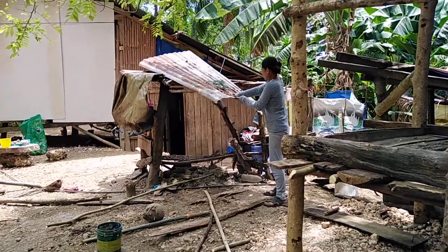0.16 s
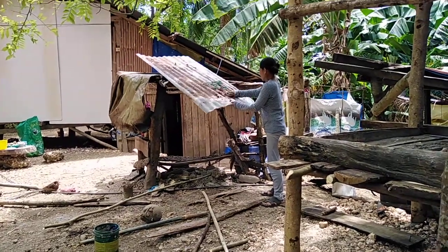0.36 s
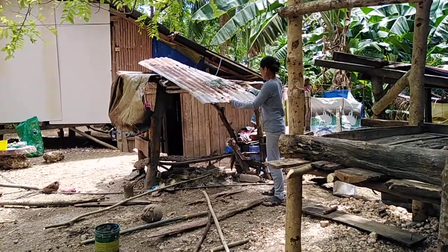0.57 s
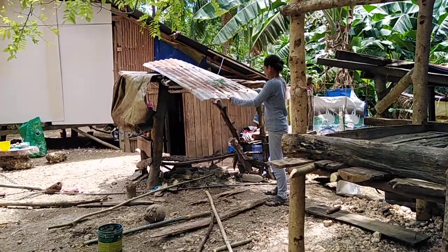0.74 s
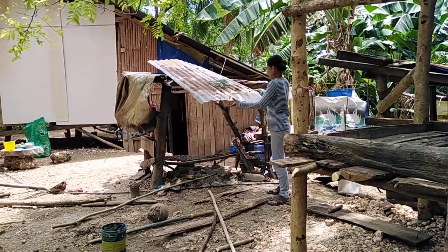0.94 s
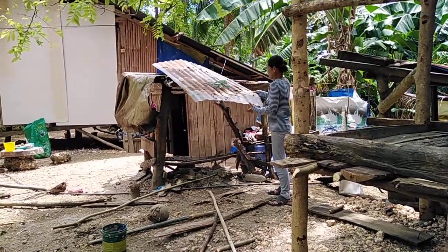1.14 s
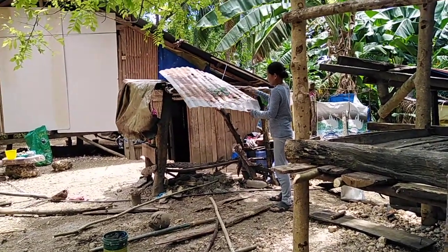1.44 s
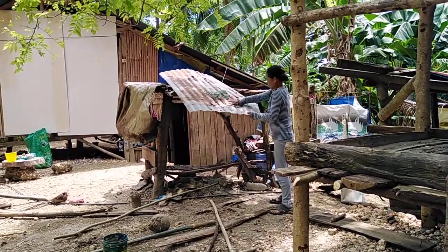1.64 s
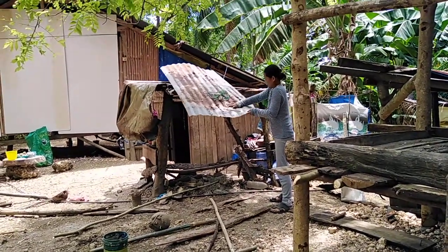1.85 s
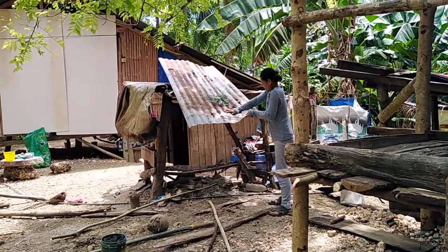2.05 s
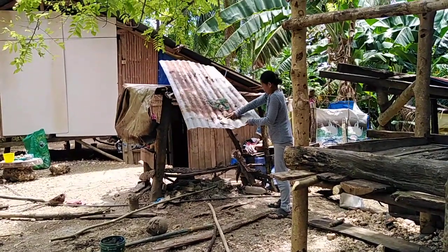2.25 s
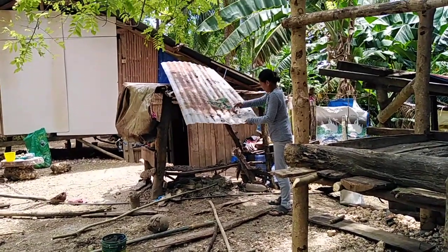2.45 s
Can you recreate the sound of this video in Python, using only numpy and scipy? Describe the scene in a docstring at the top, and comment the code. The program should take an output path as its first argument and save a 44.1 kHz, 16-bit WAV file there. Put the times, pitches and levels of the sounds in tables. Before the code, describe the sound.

Close outdoor stereo pickup of thin rusty sheet metal jolting and grating in bright clanging bursts, a short lull with wooden snaps and a soft knock, then renewed crashes and squeaks over faint leaves and a far engine.

```python
"""Outdoors at a hut: a rusty corrugated sheet is dragged off the roof frame, close to a small stereo pair.
It scrapes and jolts over the rafters: showers of tiny slips and single blows ring a plate of dense modes.
Dry stick snaps, a soft knock and short squeaks are sums of sines; a slow engine far away is a few
harmonics of its firing rate. Leaves, distance and low wind are filtered noise. The input clips at full scale."""
import sys
import numpy as np
from scipy import signal
from scipy.fft import rfft, irfft
from scipy.io import wavfile
from scipy.ndimage import uniform_filter1d

SR = 44100
rng = np.random.default_rng(int(sys.argv[2]) if len(sys.argv) > 2 else 0)


def master_out(mix):
    """Clip the mix to full scale and print it as 16-bit PCM to the path in sys.argv[1]."""
    frames = np.transpose(np.atleast_2d(mix))
    ceiling = np.clip(frames, -1, 1)
    pcm = np.round(ceiling * 32767).astype(np.int16)
    wavfile.write(sys.argv[1], SR, pcm)


def undo_db(level):
    """Turn decibels back into plain size, where 20 dB means ten times bigger."""
    steps = np.asarray(level, float) / 20
    return 10 ** steps


N = 116865  # samples in the scene
LEFT_LAG_S = 0.00006  # the left port hears the sound this much later
LEAD = 256  # samples ahead of a strike, room for the band filters to swing in


def evened(x):
    """Scales a sound to unit rms."""
    return x / np.sqrt(np.mean(x ** 2) + 1e-20)


def read(points, hz):
    """Reads a curve of (frequency [Hz], value) points along a logarithmic frequency axis."""
    f, value = np.transpose(points)
    return np.interp(np.log(hz + 1), np.log(f + 1), value)


def add(mix, s, sound):
    """Adds a sound into the mix at s seconds, cut off at the end of the mix."""
    part = mix[..., round(s * SR):][..., :sound.shape[-1]]
    part += sound[..., :part.shape[-1]]


def modes(table, length, detune):
    """Sum of exponentially dying sines (Hz, dB, t60 s), each randomly detuned by a small fraction."""
    t = np.arange(0, length, 1 / SR)
    total = np.zeros(len(t))
    for hz, db, t60 in table:
        tuned_hz = hz * (1 + detune * rng.standard_normal())
        total += undo_db(db - 60 * t / t60) * np.sin(2 * np.pi * tuned_hz * t)
    return total


def ports(a, b):
    """Two microphone ports: a shared and an unrelated part, a small delay and a colour lean."""
    # how alike the ports are: (frequency [Hz], left-right likeness [0 to 1])
    likeness = [(60, 0.69), (370, 1), (700, 0.88), (1250, 0.88), (2300, 0.47), (4200, 0.15), (7700, 0.1),
                (14000, 0.13)]
    # colour difference of the ports: (frequency [Hz], left over right [dB])
    port_lean = [(60, -16), (91, -5), (140, 3.5), (210, -2), (320, 1), (490, -3), (750, 1.5), (1140, 1),
                 (1730, 2.5), (2630, 3), (4010, 8), (6110, -0.5), (9290, -10), (14200, 9)]
    hz = np.fft.rfftfreq(a.shape[-1], 1 / SR)
    same = np.clip(read(likeness, hz), -1, 1)
    lean = undo_db(read(port_lean, hz) / 2)  # half the difference on each port
    shared = rfft(a)
    left = shared * lean * np.exp(-2j * np.pi * hz * LEFT_LAG_S)
    right = (same * shared + np.sqrt(1 - same ** 2) * rfft(b)) / lean
    return irfft(np.array([left, right]), a.shape[-1])


def air():
    """Wash of leaves and distance as coloured noise, with low wind as a narrow band of bass noise."""
    # colour of the outdoor wash: (frequency [Hz], relative density [dB per Hz])
    wash_colour = [(76, -32), (130, 5.5), (209, -12), (286, 0), (529, -5.5), (619, -34), (901, -4),
                   (1450, -2), (2420, -15), (5230, -6), (6760, -14), (7460, -10), (14600, -22)]
    wash_db, wind_db = -48, -65  # rms over both ports
    hz = np.fft.rfftfreq(N + 1, 1 / SR)
    white = rng.standard_normal((2, N + 1))
    wash = irfft(rfft(white) * undo_db(read(wash_colour, hz)), N + 1)
    wind_band = signal.butter(3, [38, 60], "band", fs=SR, output="sos")
    wind = signal.sosfilt(wind_band, rng.standard_normal((2, N + 1)))
    both = undo_db(wash_db) * evened(ports(*wash)) + undo_db(wind_db) * evened(ports(*wind))
    return both[:, :N]


def engine():
    """Far slow single-cylinder engine: low orders of the firing rate, each firing sweeping down."""
    # pace of the engine: (time [s], firings per second [Hz])
    firing_rate = [(0, 18.6), (.4, 18.6), (.7, 17.95), (1.15, 17.95), (1.3, 17.45), (2.0, 17.5),
                   (2.3, 17.95), (2.65, 18.1)]
    # harmonics of the firing rate: (multiple, relative level [dB])
    orders = [(2, -24), (3, -21), (4, -2.5), (5, -5), (6, -7.5), (7, -13), (8, -17)]
    # loudness of the engine at the microphone: (time [s], level [dB])
    distance_level = [(0, -54.5), (.7, -56.5), (1.3, -56), (1.8, -54), (2.65, -50.5)]
    start_turns, sweep_rad = 0.536, 0.1
    t = np.arange(N) / SR
    turns = start_turns + np.cumsum(np.interp(t, *np.transpose(firing_rate))) / SR
    thump = np.zeros(N)
    for k, db in orders:
        lag = sweep_rad * (k - 5) ** 2  # the lower orders arrive later in each firing
        thump += undo_db(db) * np.cos(2 * np.pi * k * turns + lag)
    return undo_db(np.interp(t, *np.transpose(distance_level))) * evened(thump)


def thuds():
    """Soft low knock: one dying sine with a gentle rise."""
    # knocks, each begun 4 ms ahead of its time: (time [s], level before the rise [dB], pitch [Hz], t60 [s])
    low_knocks = [(1.242, -20.5, 276, 0.02)]
    out = np.zeros(N)
    for s, db, hz, t60 in low_knocks:
        ring = modes([(hz, db, t60)], 0.1, 0)
        rise = np.minimum(np.arange(len(ring)) / SR / 0.0038, 1)
        add(out, s - 0.004, ring * rise)
    return out


def snaps():
    """Dry stick snaps: a cluster of very short modes, pitched and damped anew for each snap."""
    # snaps: (time [s], peak before the low cut [dB], pitch factor, ring time factor)
    breaks = [(.8965, -19, 1.35, .35), (1.2068, -5, 1.0, .9), (1.4622, -14, .65, .8)]
    # modes of the stick before those factors: (frequency [Hz], relative level [dB], t60 [s])
    stick_modes = [(764, -14, 0.046), (910, -12, 0.051), (1280, -4.5, 0.027), (1600, -20, 0.027),
                   (1880, 3, 0.015), (2005, -4, 0.073), (2330, 9, 0.015), (2700, 11, 0.017),
                   (3050, -3, 0.042), (3430, 14.5, 0.0095), (4040, -15, 0.015), (4530, 4.5, 0.011),
                   (5260, -16, .01), (7800, -18, .012)]
    low_cut_hz, rise_s = 636, 0.00027
    out = np.zeros(N)
    for s, db, pitch, ring_time in breaks:
        table = [(hz * pitch, g, t60 * ring_time) for hz, g, t60 in stick_modes]
        ring = modes(table, 0.15, 0.0072)
        ring *= np.minimum(np.arange(len(ring)) / SR / rise_s, 1)
        add(out, s, undo_db(db) * ring / abs(ring).max())
    return signal.sosfilt(signal.butter(4, low_cut_hz, "high", fs=SR, output="sos"), out)


def squeaks():
    """A part of the sheet sings briefly on one wavering note, then dies."""
    # squeaks: (time [s], level [dB], mean pitch [Hz], time from onset to the start of the decay [s])
    notes = [(.036, -26.5, 2650, 0.0086), (.378, -17, 5030, .006), (.536, -18, 2650, 0.012),
             (.991, -31.5, 1870, 0.0093), (1.557, -27, 7800, 0.0068), (1.732, -28, 1173, 0.0099),
             (1.776, -6.5, 5080, 0.002), (1.85, -13.5, 1135, 0.0056), (2.165, -24, 1200, 0.019)]
    rise_s, t60_s, wobble_rms = 0.0029, 0.026, 0.014  # wobble as a fraction of the pitch
    out, u = np.zeros(N), np.arange(SR // 10) / SR
    for s, db, hz, held in notes:
        waver = evened(uniform_filter1d(rng.standard_normal(len(u)), 60))
        phase = 2 * np.pi * np.cumsum(hz * (1 + wobble_rms * waver)) / SR
        shape = np.minimum(u / rise_s, 1) * undo_db(-60 * np.maximum(u - held, 0) / t60_s)
        add(out, s, undo_db(db) * shape * np.sin(phase))
    return out


def knocks():
    """Snaps, squeaks and the low knock at the pair, with a little dying noise as scatter from the hut."""
    scatter_db, scatter_t60_s = -11.5, 0.095
    direct = snaps() + squeaks() + thuds()
    u = np.arange(4000) / SR
    scatter = rng.standard_normal((2, 4000)) * undo_db(-60 * u / scatter_t60_s) * (u > 0.001)
    scatter /= np.linalg.norm(scatter[0])
    lagged = np.interp(np.arange(N) - LEFT_LAG_S * SR, np.arange(N), direct)
    scattered = signal.oaconvolve(direct[None], scatter, axes=1)[:, :N]
    return np.array([lagged, direct]) + undo_db(scatter_db) * scattered


def plate():
    """Response of the sheet from one contact point: dense modes dying by band, (treble, body, boom) x ports."""
    # colour of the sheet: (frequency [Hz], relative density [dB per Hz])
    sheet_colour = [(59, -53), (100, -23.5), (195, -13), (372, -11.5), (667, -16), (788, -4.5), (951, -1.5),
                    (1200, -0.5), (1330, -4), (1570, 0), (2330, -3.5), (2700, -2), (3760, -7.5), (5150, -4),
                    (6340, -5.5), (7490, -2.5), (9230, -15), (13700, -19), (14600, -73)]
    # decay of the dense modes: (frequency [Hz], t60 [s])
    ring_t60 = [(150, 0.083), (500, 0.75), (1000, 0.27), (2500, 0.17), (5000, 0.17), (8000, 0.15),
                (13000, 0.11)]
    # modes that stand out of the clatter: (frequency [Hz], relative level [dB], t60 [s])
    clear_modes = [(916, -4, 0.13), (1130, -19.5, 0.1), (1715, 3, 0.75), (2650, 9, 0.38), (5094, 16, 0.18),
                   (5740, 3, 0.45), (7200, -18, .12), (6700, -17, 0.13), (7540, 15, 0.05),
                   (7700, -63.5, .15), (7720, 54, 0.072)]
    crack_db, crack_t60_s = -6, 0.0076  # the fast-dying start, relative to the ring
    clear_db = -11.5  # clear modes relative to ring and crack
    patch_db, patch_hz = 0.5, 394.4  # random colour of this contact point: spread and spacing
    split_hz, boom_hz = 2577, 693  # treble above the first, boom below the second, body between
    size = 24576

    # Dense modes: noise, each frequency dying at its own rate
    raw = rng.standard_normal((2, size))
    raw[:, :256] = 0  # silence ahead of the strike
    hz, t, z = signal.stft(raw, SR, nperseg=128)
    t60 = read(ring_t60, hz)[:, None]
    ring = signal.istft(z * undo_db(-60 * t / t60) / np.sqrt(t60), SR, nperseg=128)[1][:, 256:size]
    length = ring.shape[1]
    u = np.arange(length) / SR
    crack = raw[:, -length:] * undo_db(-60 * u / crack_t60_s)
    ring = evened(ring) + undo_db(crack_db) * evened(crack)

    fine = np.fft.rfftfreq(length, 1 / SR)
    knots = rng.standard_normal(200)
    patch = patch_db * np.interp(fine / patch_hz, np.arange(len(knots)), knots)
    ring = irfft(rfft(ring) * undo_db(read(sheet_colour, fine) + patch), length)
    clear = modes(clear_modes, 1, 0.0066)[:length]
    both = ports(*(evened(ring) + undo_db(clear_db) * evened(clear)))

    low, boom = 1 / (1 + (fine / np.array([[split_hz], [boom_hz]])) ** 8)
    splits = np.array([1 - low, low - boom, boom])[:, None]
    bands = np.roll(irfft(rfft(both) * splits, length), LEAD, 2)
    fade_in = np.sin(np.pi / 2 * np.minimum(u * SR / LEAD, 1)) ** 2
    fade_out = np.minimum((u[-1] - u) * 10, 1)
    bands = bands * fade_in * fade_out
    return bands / np.sqrt((bands ** 2).sum(2).mean(1))[:, None, None]  # unit energy per band


def sheet(count=8):
    """Slips under drag and jolt envelopes, plus blows, ring the plate; contact moves between its points."""
    # times at which the sheet jolts [s]
    jolt_times = [.035, .1015, .13, .1436, .19, .283, .369, .377, .398, .4738, .5337, .645, .707, .781,
                  1.078, 1.208, 1.352, 1.39, 1.4625, 1.5555, 1.717, 1.7444, 1.7745, 1.8138, 1.8447, 1.9005,
                  1.909, 1.927, 2.0178, 2.1166, 2.179, 2.552]
    # jolts, one row per time: (relative treble level [dB], body over treble [dB],
    # left-right lean before the port weights [dB], decay time constant [s], relative blow level [dB])
    jolts = [(-21, -13, 0.5, 0.02, 3.5), (-6, -15.5, -3.5, 0.069, 4), (-5, -18.5, -11, 0.056, -2.5),
             (-1, -13, -3.5, 0.061, 3), (-7.5, -1.5, 1, 0.079, 1), (-6, -7, -3.5, 0.023, 0.5),
             (-10, -18.5, -8, .03, 3), (-3, -18, -0.5, 0.022, 0), (-13.5, 4, 0, 0.059, 1),
             (-7, -7, 0, 0.028, -0.5), (-5.5, -19, 0.5, 0.029, 0), (-25.5, 5, -4, 0.04, 5),
             (-19.5, 0.5, -3.5, 0.019, 0.5), (-23, 2, -0.5, 0.049, 3), (-31.5, -7, 0, 0.037, 1),
             (-24.5, -3.5, 1.5, 0.019, -2), (-21.5, -5.5, 1.5, 0.044, -1.5), (-38, 15, 0, 0.025, -3),
             (-29.5, 0.5, 1, 0.018, 5), (-31.5, -4.5, 0, 0.054, 0), (-33.5, 5, 2, 0.045, -5),
             (-28, 3.5, 4, .05, 7), (-10, -2.5, 1.5, 0.045, -4), (-4, -8.5, 0, 0.027, 4),
             (-1, -9, 0.5, .033, -4), (-5, -10, 0.5, .01, 7.5), (-7.5, -7, -3, 0.036, -4),
             (0, -13, -0.5, 0.047, 4.5), (-1.5, -10, 0, 0.024, 3), (-5.5, 4, -1, 0.06, 0),
             (1.5, -9, 1, 0.064, -2.5), (-25, -20, 4.5, .03, -2)]
    # steady drag in stretches: (time [s], treble level [dB], body level [dB], boom level [dB])
    drag = [
        [(0.0, -38.5, -35, -44.5), (0.126, -34.5, -32.5, -38), (0.168, -28, -23, -34), (0.284, -24, -25, -46.5),
         (0.366, -29.5, -26, -38), (0.528, -28, -25.5, -39.5), (0.748, -33, -37, -43.5), (0.87, -34, -37, -43),
         (0.95, -45, -45.5, -50.5)],
        [(0.96, -41, -42, -59), (1.058, -44.5, -44.5, -57.5), (1.376, -39.5, -45.5, -55.5),
         (1.526, -67, -50, -59.5), (1.72, -44, -51.5, -56)],
        [(1.73, -48, -54, -44), (1.808, -45, -42, -48), (1.916, -32, -23.5, -35), (1.976, -20, -22.5, -41.5),
         (2.064, -48, -26.5, -39), (2.154, -8, -34, -49.5), (2.274, -45, -19, -32), (2.424, -30.5, -30, -42.5),
         (2.65, -30, -34, -45)],
    ]
    jolt_gain_db, jolt_rise_s, blow_gain_db = -6.5, 0.001, 21
    boom_db = -17  # boom of a jolt relative to its body
    slips_per_s, slip_spread_db = 5000, 3.5
    dwell_s = 0.01  # mean time between choices of contact point, blurred at the borders
    t = np.arange(N) / SR
    s, *bands_db = np.concatenate(drag).T
    push, blows = np.zeros((2, 3, 2, N))  # power of the slips and amplitude of the single blows: (treble, body, boom) x ports
    push += undo_db(np.array([np.interp(t, s, db) for db in bands_db]))[:, None] ** 2
    u = t[:SR // 2]
    for s, (db, body_db, pan_db, slip_s, blow_db) in zip(jolt_times, jolts):
        shape = np.minimum(u / jolt_rise_s, 1) * np.exp(-u / slip_s)
        band_db = np.array([[0], [body_db], [body_db + boom_db]])
        port_db = np.array([[0.78, -0.63]]) * pan_db
        gain = undo_db(jolt_gain_db + db + band_db + port_db)[..., None]
        add(push, s, (gain * shape) ** 2)
        add(blows, s, gain * undo_db(blow_gain_db + blow_db))  # one sample long

    sizes = undo_db(slip_spread_db * np.minimum(rng.exponential(1, N), 3))
    happens = rng.random(N) < slips_per_s / SR
    slips = evened(sizes * happens * rng.choice([-1., 1.], N))
    drive = np.sqrt(push) * slips + blows
    point = rng.integers(0, count, N)[(t / dwell_s + rng.random(N)).astype(int)]
    out = np.zeros((2, N))
    for k in range(count):
        rung = signal.oaconvolve(drive * (point == k), plate(), axes=2)
        out += rung[..., LEAD:N + LEAD].sum(0)
    return out


def scene():
    """The whole place at the microphone pair, left and right."""
    return air() + engine() + knocks() + sheet()


def low_pass(x):
    """Removes everything above the highest recorded frequency."""
    return signal.sosfilt(signal.butter(12, 14750, fs=SR, output="sos"), x)


def record(dry):
    """The microphone input clips at full scale."""
    mix = np.clip(dry, -1, 1)
    return low_pass(mix)


dry = scene()
out = record(dry)
master_out(out)
```